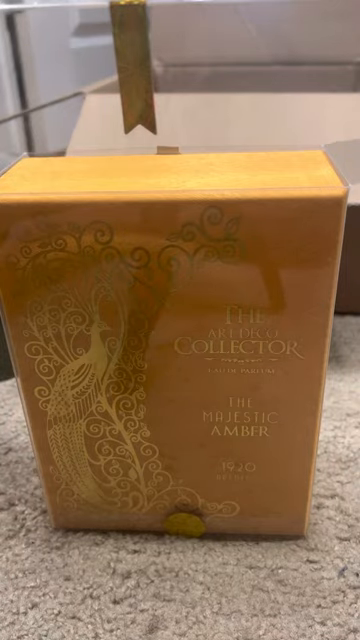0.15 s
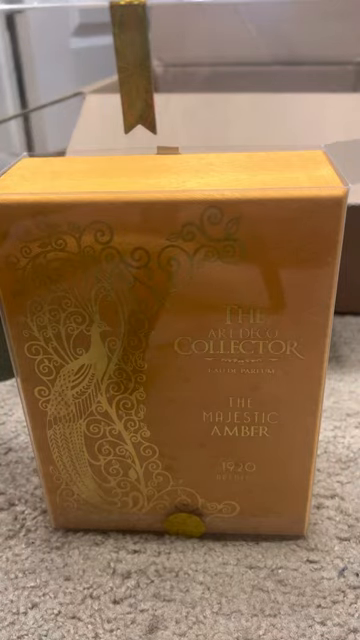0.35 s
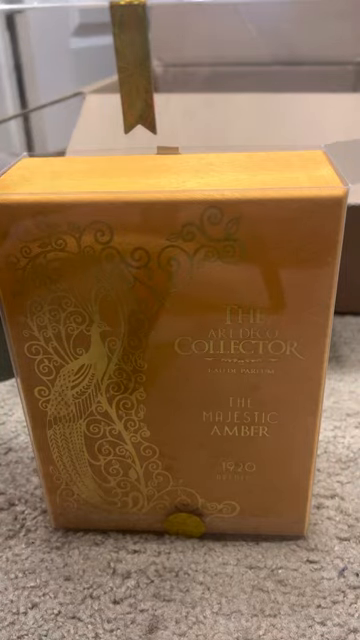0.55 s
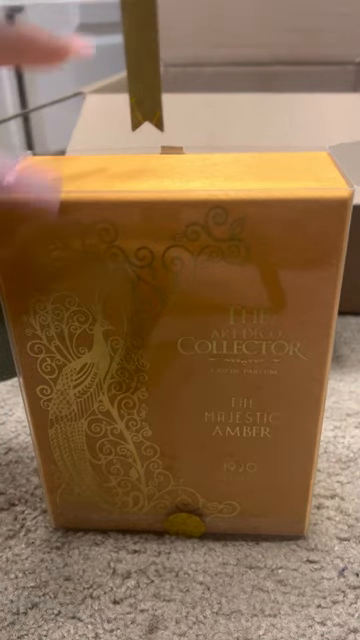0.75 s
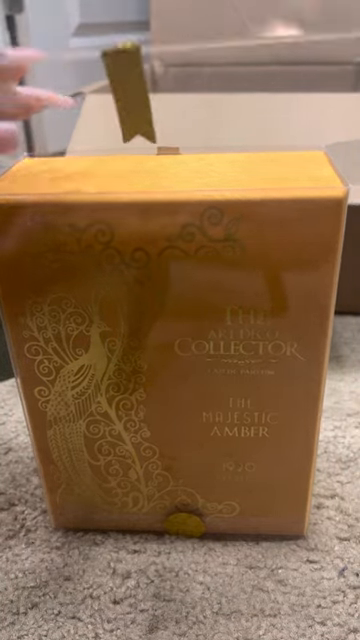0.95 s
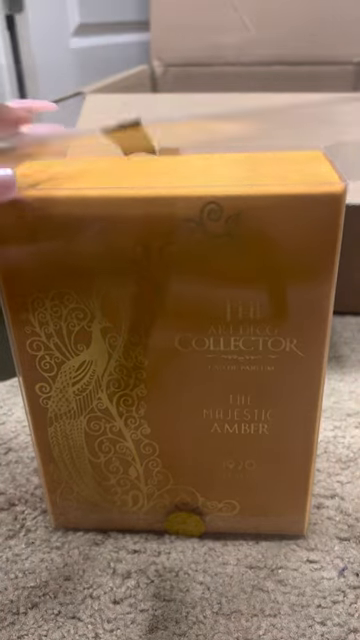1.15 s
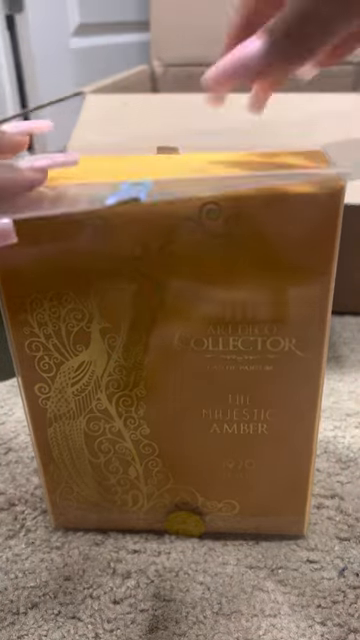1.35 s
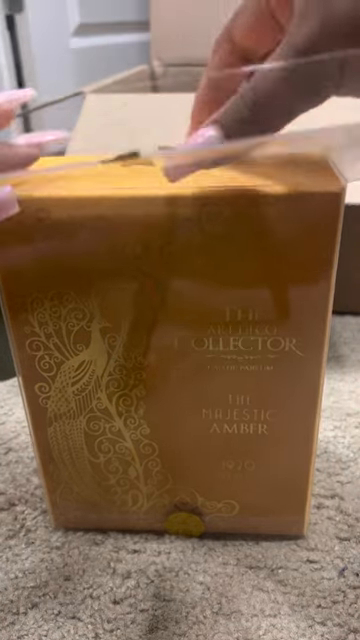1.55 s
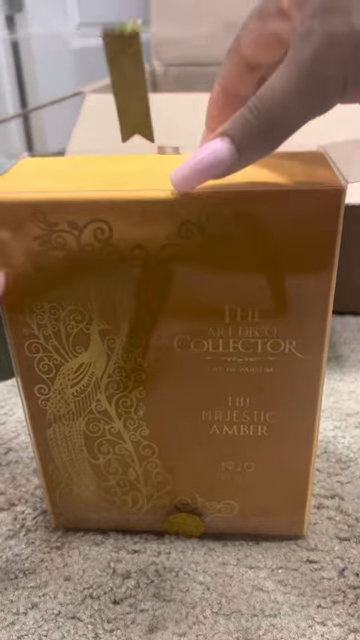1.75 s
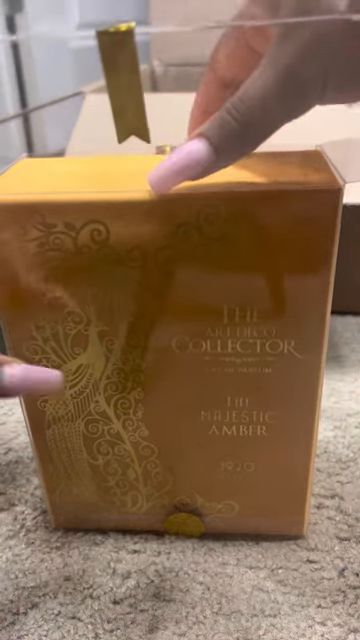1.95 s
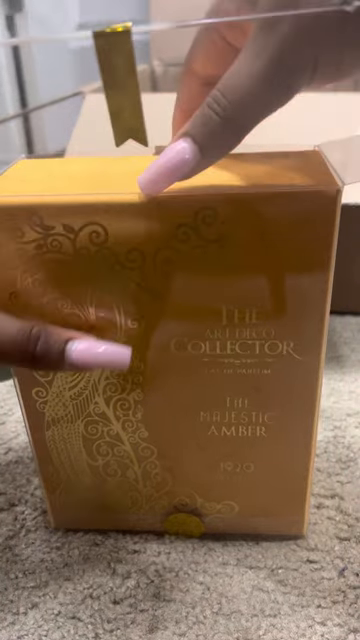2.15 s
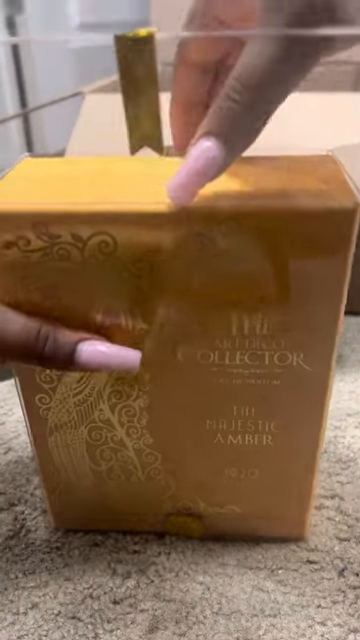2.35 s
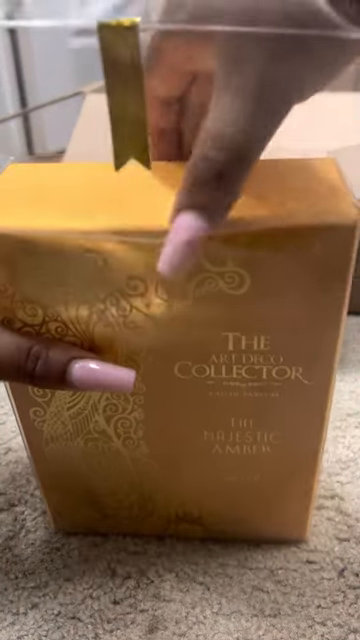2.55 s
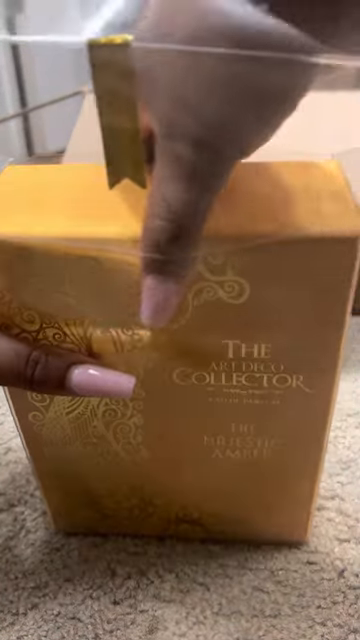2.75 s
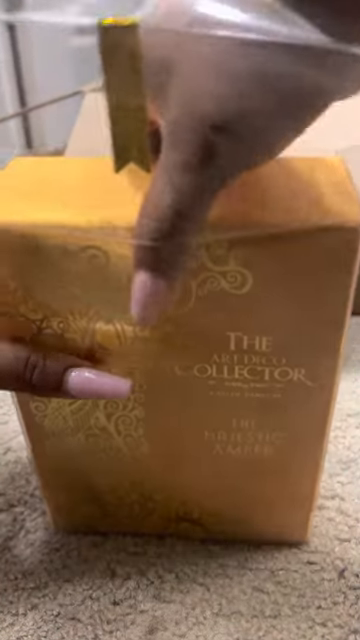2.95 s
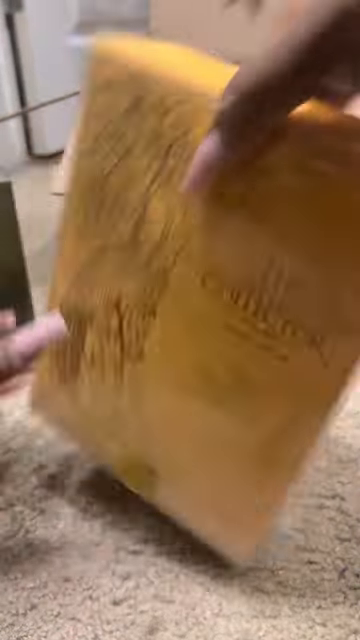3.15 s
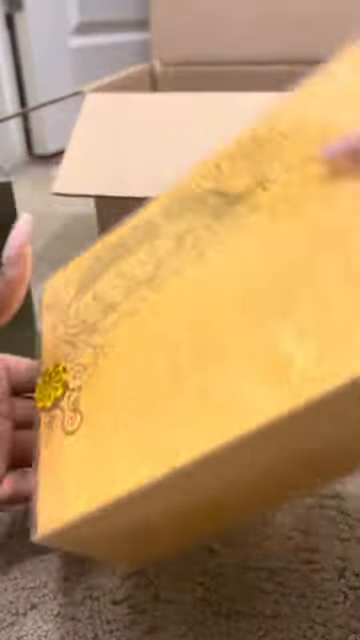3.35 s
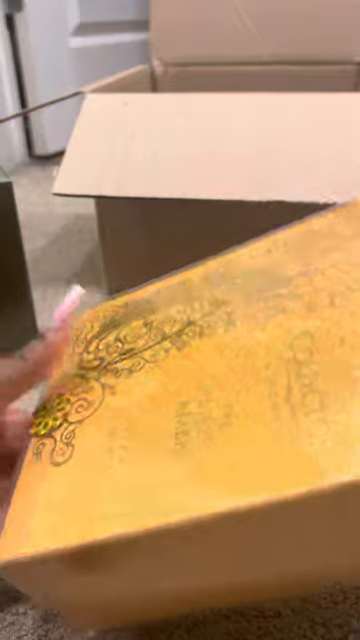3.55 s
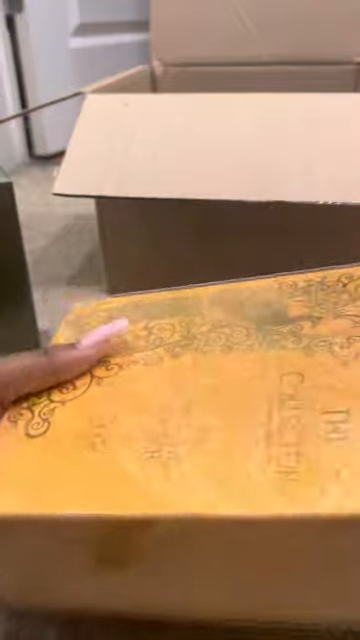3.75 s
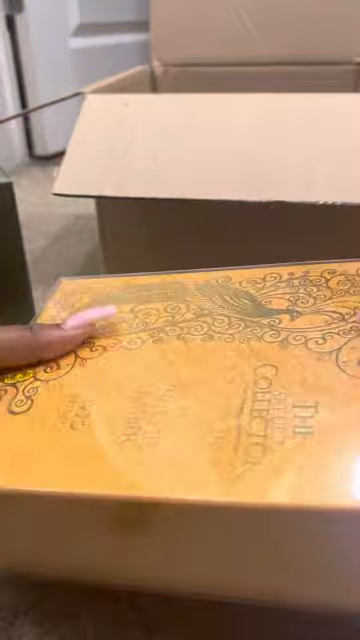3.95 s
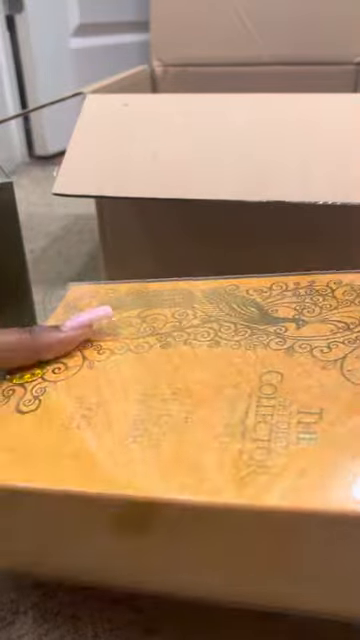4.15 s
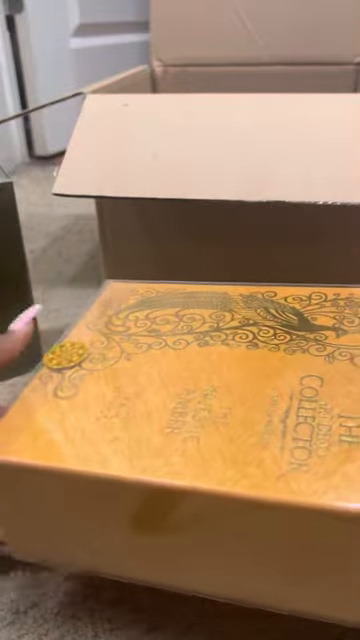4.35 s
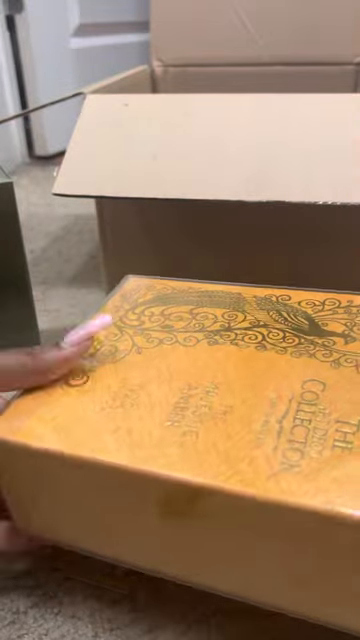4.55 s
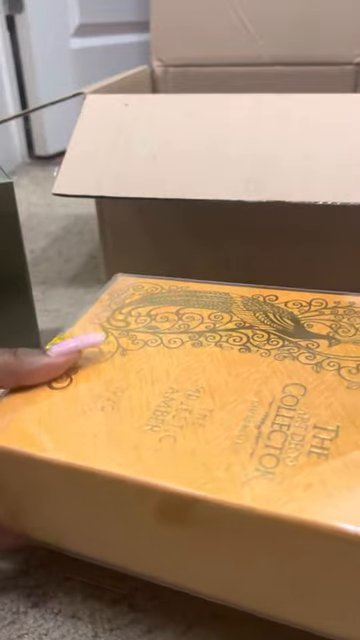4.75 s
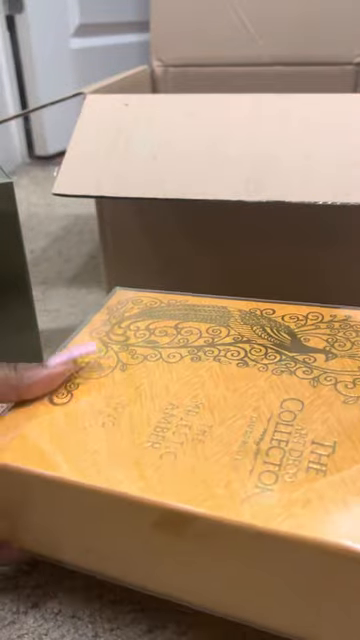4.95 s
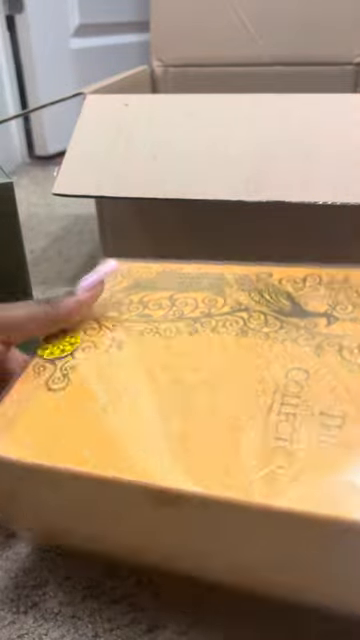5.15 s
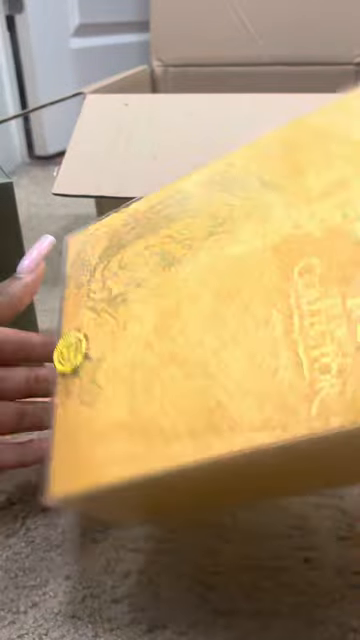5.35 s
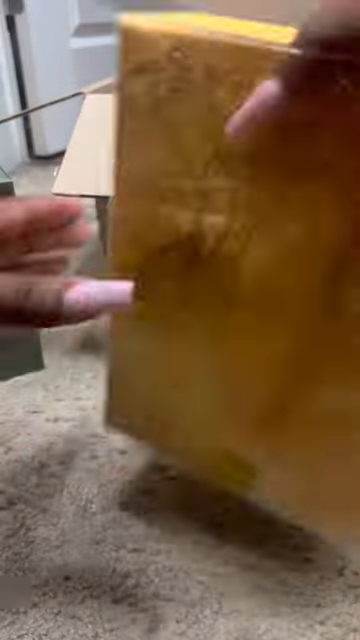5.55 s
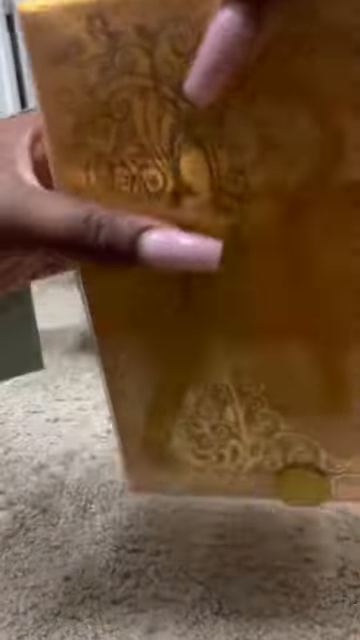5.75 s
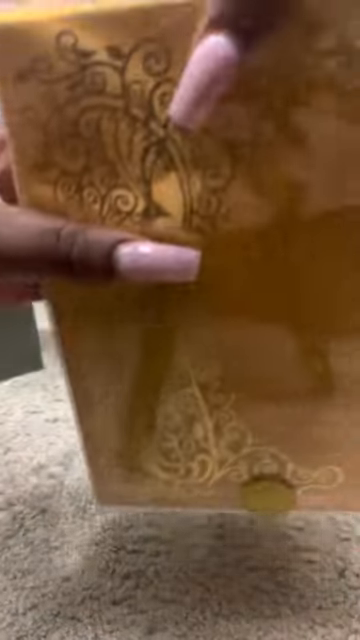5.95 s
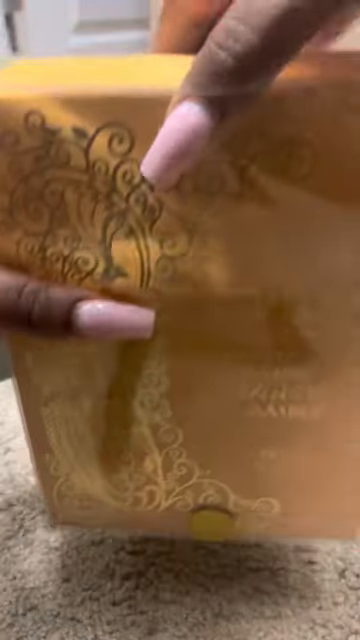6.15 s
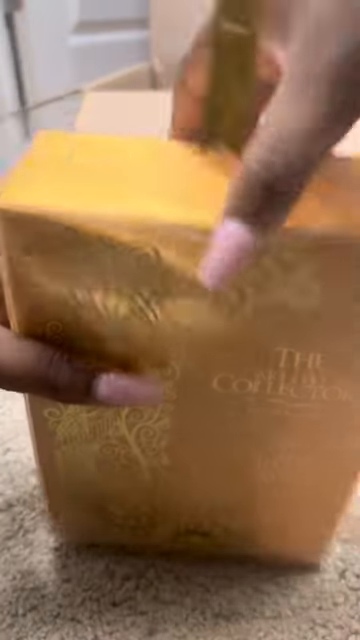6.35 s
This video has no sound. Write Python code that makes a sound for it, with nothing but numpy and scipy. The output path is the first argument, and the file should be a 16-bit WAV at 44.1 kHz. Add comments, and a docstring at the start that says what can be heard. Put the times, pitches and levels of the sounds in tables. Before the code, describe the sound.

Close, dry stereo handling sounds indoors. A stiff hollow box in thin plastic is tapped by long nails, gripped with squeaky rustling rubs, turned over and laid on carpet with soft boxy knocks and sharp little crackles. A quieter pause holds sparse clicks and faint rubs; then the box is picked up with a thump, swishing fingers and light taps. Low room rumble stays underneath.

```python
"""A quiet room rumbles, hums and hushes; then hands with long nails tip a stiff card box in a clear
plastic sleeve, lay it on a carpet and lift it again, close by and in stereo.
The box knocks hollow as decaying panel tones with a thump; nails and sleeve tick as band-split noise bursts.
Fingers slide over the plastic as grainy noise coloured by sleeve and box; a sparse echo tail adds the room."""
import sys
import numpy as np
from scipy import signal
from scipy.fft import rfft, irfft, next_fast_len
from scipy.io import wavfile
from scipy.ndimage import uniform_filter1d

SR = 44100
rng = np.random.default_rng(int(sys.argv[2]) if len(sys.argv) > 2 else 0)


def generate_wav(sig):
    """Save sig (samples, or channels by samples) to the path in sys.argv[1] as 16-bit PCM at SR."""
    pcm = np.round(np.clip(np.atleast_2d(sig).T, -1, 1) * 32767).astype(np.int16)
    wavfile.write(sys.argv[1], SR, pcm)


N = 286473  # samples in the scene

# pitch and height of the sleeve's ring while it settles or the hands rest on it
SETTLE_RING_HZ, SETTLE_RING_DB = 1790, -9.5


def gain_of(db):
    """Decibels to gain."""
    return 10 ** (np.asarray(db) / 20)


def evened(x):
    """Scales to rms 1."""
    return x / np.sqrt(np.mean(x ** 2) + 1e-20)


def wander(noise, samples):
    """Smooths noise twice over a window into a slow random drift of rms 1."""
    return evened(uniform_filter1d(uniform_filter1d(noise, samples), samples))


def read(points, hz):
    """Reads a table on a log-frequency axis."""
    f, value = np.transpose(points)
    return np.interp(np.log(hz + 1), np.log(f + 1), value)


def add(mix, s, sound):
    """Mixes a sound in at s seconds."""
    part = mix[..., round(s * SR):][..., :sound.shape[-1]]
    part += sound[..., :part.shape[-1]]


def shaped(x, response):
    """Filters x by a function of frequency."""
    size = next_fast_len(x.shape[-1])
    hz = np.fft.rfftfreq(size, 1 / SR)
    return irfft(rfft(x, size) * response(hz), size)[..., :x.shape[-1]]


def band(hz, centre_hz, octaves):
    """Gain of a flat-topped band, halved at the given octaves to either side of its centre."""
    return 1 / (1 + (np.log2((hz + 1) / centre_hz) / octaves) ** 6)


def paired(left, other):
    """Makes two channels whose likeness depends on frequency: the right is part left, part other."""
    # how alike left and right are: (f/Hz, likeness 0 to 1)
    likeness = [(60, 1), (130, 0.99), (290, 0.98), (640, 0.35), (1410, 0.94), (3100, 0.45), (6820, 1),
                (15000, 0.11)]
    same = lambda hz: np.clip(read(likeness, hz), -1, 1)
    different = lambda hz: np.sqrt(1 - same(hz) ** 2)
    return np.array([left, shaped(left, same) + shaped(other, different)])


def hush():
    """Soft low band of noise, independent in the two channels, that rises slightly, then sinks and stays low."""
    # the hush in the room: (t/s, level/dB)
    hush_levels = [(0, -80), (1.4, -78.5), (3.9, -85.5), (4.9, -85), (6.49, -85.5)]
    noise = evened(shaped(rng.standard_normal((2, N)), lambda hz: band(hz, 686, 0.56)))
    return noise * gain_of(np.interp(np.arange(N) / SR, *np.transpose(hush_levels)))


def air():
    """Rumble and hiss of the room, shaped noise that swells a little, with a steady mains hum."""
    # spectrum of the room air: (f/Hz, relative level/dB per Hz)
    air_colour = [(12, -42.5), (20, -27.5), (40, -13), (63, -1.5), (77, -1), (86, -10), (128, -9.5),
                  (185, -34.5), (238, -23), (333, -39.5), (619, -47), (1090, -51), (5260, -53), (8970, -57),
                  (16700, -76)]
    # width of the room air: (f/Hz, side over mid/dB)
    air_width = [(60, -23), (110, -14), (200, -7), (380, 8), (700, 16.5), (1290, 6), (2380, -5.5),
                 (4400, 0.5), (8120, 4), (15000, -12)]
    air_db, hum_db, hum_hz = -57.5, -66, 120  # rms levels and hum pitch
    mid, side, drift = rng.standard_normal((3, N))
    mid = shaped(mid, lambda hz: gain_of(read(air_colour, hz)))
    side = shaped(side, lambda hz: gain_of(read(air_colour, hz) + read(air_width, hz)))
    swell = gain_of(0.57 * wander(drift, 9000))
    scale = gain_of(air_db) / np.sqrt(np.mean(mid ** 2))
    hum = np.sqrt(2) * gain_of(hum_db) * np.sin(2 * np.pi * hum_hz * np.arange(N) / SR)
    return scale * swell * np.array([mid + side, mid - side]) + hum


def room(x):
    """Echoes x from sparse taps of random sign, one in every 20 samples, each band dying at its own speed."""
    # decay of the room: (f/Hz, t60/s)
    room_decay = [(200, 0.3), (1000, 0.19), (4000, 0.11), (12000, 0.28)]
    taps = np.zeros((2, SR // 2))
    at = np.arange(200, SR // 2 - 20, 20) + rng.integers(0, 20, (2, (SR // 2 - 201) // 20))
    np.put_along_axis(taps, at, rng.choice([-1., 1.], at.shape), 1)
    hz, t, bins = signal.stft(taps, SR, nperseg=256)
    decay = gain_of(-60 * t / read(room_decay, hz)[:, None])
    tail = signal.istft(bins * decay, SR, nperseg=256)[1]
    tail = tail / np.linalg.norm(tail[0])
    return paired(*signal.fftconvolve(x[None], tail, axes=1)[:, :N])


def contact(t):
    """Sums all touches at times t into powers of rub, treble and box, and pitch and height of the sleeve's ring."""
    # fingers and carpet sliding on the sleeve: (top reached t/s, rise/s, hold/s, fall/s, nominal rub level/dB,
    # treble share/dB, share carried by the box/dB, sleeve ring f/Hz, ring height/dB)
    slides = [(.53, 0.19, 0.053, 0.15, -74, -9.5, -10, 3480, 15),
              (.785, 0.13, 0.0036, 0.023, -62.5, -2, -3, 2630, 1),
              (.95, 0.11, 0.11, 0.28, -73.5, -16, -3, 2080, 6),
              (1.17, 0.47, 0.22, 0.082, -75.5, -8, 5, 3660, 4),
              (1.6, 0.052, 0.066, 0.068, -49.5, -12, 7, 1670, -14),
              (1.87, 0.15, .1, 0.16, -62, -27, 11.5, 1800, 5.5),
              (2.07, 0.14, 0.0083, 0.073, -68.5, -23, 14.5, 1850, -9),
              (2.17, 0.077, 0.075, 0.023, -58.5, -10.5, 3, 2140, -15),
              (2.29, 0.11, 0.017, 0.076, -63, -15.5, 9, 1280, -7),
              (2.43, 0.072, 0.014, 0.049, -56, -27, 10, 1780, 6),
              (2.6, 0.14, 0.076, 0.13, -47, -3, 3, 2500, -2),
              (2.68, 0.04, 0.039, 0.18, -54, -14, 13, 2130, 5),
              (2.83, 0.047, 0.072, 0.043, -48.5, -5, 5, 2270, 8),
              (3.05, 0.12, 0.074, .15, -56, -4.5, -9, 2520, 13),
              (3.2, 0.29, 0.058, .06, -61.5, 3, 7.5, 2400, 3),
              (3.31, 0.066, 0.024, 0.13, -52, -5.5, 9.5, 1720, 15),
              (3.37, .04, 0.035, 0.043, -48, -7, 0, 2440, 2),
              (3.57, 0.016, 0.092, 0.054, -53, -13, 5, 1880, 6.5),
              (3.79, 0.077, 0.0062, 0.15, -66, -13, 8, 2050, -18),
              (3.925, 0.022, 0.031, 0.11, -71, -5, 8.5, 2820, 7),
              (4.16, 0.085, 0.081, .06, -62.5, -1.1, 0.5, 2370, 16),
              (4.25, 0.076, 0.025, 0.038, -58.5, -3.5, 5, 2040, 13),
              (4.73, 0.066, 0.044, 0.035, -75, -7, -4, 2210, 2),
              (5.01, 0.035, 0.013, 0.13, -73.5, -0.5, -7.5, 2310, 8),
              (5.11, 0.034, 0.012, 0.057, -73, 8, 15, 2170, 8),
              (5.165, 0.095, 0.022, .04, -69, 0, 11, 2170, 4),
              (5.25, .1, 0.084, .05, -61, -4.5, 4, 2090, 14),
              (5.4, .1, 0.22, .12, -77, -6.5, 15.5, 3330, 3),
              (5.59, 0.096, 0.055, 0.036, -65.5, -12, 5, 1880, 7),
              (5.745, 0.09, 0.0058, 0.045, -63, -0.5, 7, 1830, 0),
              (5.79, 0.07, 0.083, 0.049, -58, -6.5, 8, 1910, 1),
              (5.93, 0.046, .01, 0.1, -73, -20, 11, 1760, 0),
              (6.12, 0.081, 0.1, 0.088, -55.5, -4.5, 8.5, 1930, 1),
              (6.37, 0.11, 0.018, 0.042, -49, -3, 4, 1890, 6),
              (6.41, .05, 0.064, 0.077, -57.5, -4, 3.5, 2020, 3)]
    # the sleeve settling after a blow: (peak t/s, fall/s, nominal rub level/dB, share carried by the box/dB)
    settlings = [(.69, 0.036, -66, 14), (0.819, 0.23, -56.5, 11), (1.491, 0.047, -54, 10),
                 (1.689, 0.086, -66.5, 27), (1.8, 0.061, -76, 23), (2.488, 0.068, -45, 11),
                 (2.97, 0.082, -59.5, 19.5), (3.44, 0.14, -56, 14.5), (3.68, 0.17, -65, 15),
                 (4.489, 0.062, -60, 11), (4.565, 0.09, -61.5, 12.5), (5.668, 0.063, -50.5, -22)]
    settle_rise_s, settle_treble_db = 0.035, -11
    rest_db, rest_treble_db, rest_box_db = -95.5, -10, 25  # hands resting on the sleeve
    depth_db, roundness = 20, 0.97  # down by this after the rise or fall time; 1 = pointed, 2 = round

    touches = slides + [(s, settle_rise_s, 0, fall, db, settle_treble_db, box_db, SETTLE_RING_HZ, SETTLE_RING_DB)
                        for s, fall, db, box_db in settlings]
    s, rise, hold, fall, db, treble_db, box_db, ring_hz, ring_db = np.transpose(touches)[:, :, None]
    before, after = (s - t) / rise, (t - s - hold) / fall
    away = np.maximum(np.maximum(before, after), 0)
    power = gain_of(db - depth_db * away ** roundness) ** 2
    rest = gain_of(rest_db) ** 2

    rub = power.sum(0) + rest
    treble = (power * gain_of(treble_db) ** 2).sum(0) + rest * gain_of(rest_treble_db) ** 2
    box = (power * gain_of(box_db) ** 2).sum(0) + rest * gain_of(rest_box_db) ** 2
    # the stronger touch has more say in the ring
    mean_ring_hz = ((power * ring_hz).sum(0) + rest * SETTLE_RING_HZ) / rub
    mean_ring_db = ((power * ring_db).sum(0) + rest * SETTLE_RING_DB) / rub
    return rub, treble, box, mean_ring_hz, mean_ring_db


def rubbing():
    """Skin and fibres slip in dense, clumped grains; the free part of the sleeve rings with a moving pitch."""
    # slow rub of the sleeve: (f/Hz, relative level/dB per Hz)
    sleeve_colour = [(290, -33.5), (500, -23.5), (581, -2), (1160, -0.5), (1730, -10), (2000, -10.5),
                     (2810, -9.5), (3230, -7), (3790, -8.5), (5500, -23), (7150, -40.5), (12100, -120)]
    # fast rub, the treble: (f/Hz, relative level/dB per Hz)
    sizzle_colour = [(2350, -45.5), (4000, -3.5), (4450, -0.5), (5230, -7.5), (5830, 0.5), (13000, -14),
                     (14700, -15), (15700, -15.5), (16700, -60.5)]
    # box carrying the rub: (f/Hz, relative level/dB per Hz)
    boom_colour = [(35, -36.5), (60, -4), (113, -6), (150, -5), (183, -4), (270, -20.5), (385, -9.5),
                   (600, -49.5), (780, -42), (1320, -120)]

    clumps = wander(rng.standard_normal(N), 250)
    catches = wander(rng.standard_normal(N), 900)  # the fingers catch and let go
    grain_sizes = np.minimum(rng.exponential(1, N), 6)
    grains = gain_of(2 * catches + 0.86 * grain_sizes + 0.49 * clumps)
    hz, t, slips = signal.stft(paired(*rng.standard_normal((2, N)) * grains), SR, nperseg=512, noverlap=384)

    *powers, ring_hz, ring_db = contact(t)
    ring = 1 + gain_of(ring_db) / (1 + (np.log2((hz[:, None] + 1) / ring_hz) / 0.4) ** 4)
    sleeve = gain_of(read(sleeve_colour, hz))[:, None] * ring
    sizzle = gain_of(read(sizzle_colour, hz))[:, None]
    boom = gain_of(read(boom_colour, hz))[:, None]
    colour = np.sqrt(sum(body ** 2 / (body ** 2).mean(0) * power
                         for body, power in zip((sleeve, sizzle, boom), powers)))

    # the contact wanders, so patches of the spectrum come and go
    patches = uniform_filter1d(rng.standard_normal(slips.shape[1:]), 5, 0)
    patches = evened(uniform_filter1d(patches, 14, 1))
    colour = colour * gain_of(2.95 * patches - 3.5)
    rub = signal.istft(slips * colour, SR, nperseg=512, noverlap=384)[1][:, :N]
    return rub / np.sqrt(np.mean(grains ** 2))


def ticks():
    """A burst of tiny snaps: the card gives a woody note and a bite, the sleeve a crack, the nail edge a spit."""
    # nails tapping the card: (t/s, note level/dB, woody note f/Hz, edge share/dB, t60/s,
    # pan/dB: half of it is the lead of left over right)
    nail_taps = [(.666, -58.5, 1030, 3, 0.071, 5), (.794, -32.5, 1290, 0.5, .02, 1.5),
                 (1.461, -32, 970, -20.5, 0.025, 1.5), (1.476, -36, 780, -3.5, 0.011, -6),
                 (1.548, -50, 744, -8, 0.075, -1.5), (1.666, -37, 634, -16, 0.071, -4),
                 (1.575, -45, 690, -34, 0.025, 0.6), (1.686, -45.5, 1160, -21, 0.023, 0.6),
                 (1.788, -53.5, 840, -18, 0.071, 1), (2.038, -46, 770, -27, .04, 0),
                 (2.05, -43.5, 1000, -19.5, 0.013, -1), (2.443, -32.5, 1100, -12, 0.046, -0.5),
                 (2.932, -20, 1256, -30, 0.018, -5.5), (3.318, -42, 996, -2, 0.022, -7),
                 (3.416, -32, 726, -34, 0.023, -17.5), (3.565, -59, 799, -11, 0.027, -12.5),
                 (3.636, -35.5, 1167, -13, 0.056, -11.5), (3.645, -26, 1130, -30, 0.035, -9.5),
                 (4.544, -52.5, 1510, 7.5, .037, 0), (4.551, -42.5, 1330, -11.5, 0.024, -5),
                 (5.643, -44.5, 776, -33, 0.0077, -4), (5.74, -49, 1320, -3, 0.041, -.6),
                 (5.77, -49.5, 696, -4, 0.031, -3), (6.315, -57, 914, 5, 0.026, -4),
                 (6.373, -49, 1030, -2.5, 0.045, -1.5)]
    # the sleeve cracking under a nail: (t/s, bite level/dB, crack level/dB, spit level/dB, spit f/Hz, pan/dB as above)
    sleeve_cracks = [(0.98, -53, -52, -87, 6110, .6), (1.15, -84, -46, -92, 7350, 1),
                     (1.616, -38.5, -71, -46, 6110, -2.5), (2.097, -59, -72, -89, 8100, -2),
                     (2.37, -62, -67, -74, 7000, 0.6), (2.462, -32, -45, -28, 7300, 6),
                     (2.6, -45, -47, -44, 7000, 0.6), (2.827, -43.5, -61, -40, 8400, -1.5),
                     (2.852, -43, -44, -43.5, 8670, -2), (2.884, -44, -50, -34, 8700, 0),
                     (3.312, -39, -41, -46, 7700, 10), (3.337, -37, -41, -42, 6900, 3),
                     (3.354, -27, -24, -22.5, 7270, -.6), (3.606, -52, -47, -42.5, 11940, 13),
                     (3.612, -57, -59, -40.5, 11600, -19), (3.619, -51, -82, -45, 11600, -11),
                     (3.784, -59, -57, -52, 6680, -4), (3.789, -60.5, -64, -36.5, 12000, 0),
                     (3.861, -73.5, -68, -61, 7190, -3), (3.911, -53, -41, -18, 10600, 1.5),
                     (4.15, -56.5, -57, -42, 14300, -1.5), (4.249, -52, -68, -52, 7100, -5),
                     (4.277, -45.5, -48, -43, 8900, -1.5), (4.47, -46.5, -44, -43, 7100, 0.5),
                     (4.627, -80.5, -65, -72.5, 7000, -1.5), (4.759, -72, -76, -88, 7000, -4),
                     (4.774, -72, -76, -90, 7000, -1.5), (5.158, -62, -61, -47, 9000, -1.5),
                     (5.167, -64, -66, -41, 12600, -1.5), (5.952, -63, -69, -54, 7400, 3),
                     (5.967, -47.5, -44, -39, 10700, 1)]
    bite_part, crack_part = 0.43, 1  # how much of a tap's edge share, in dB, its bite and crack follow
    tap_spit_hz = 6800
    crack_note_hz, crack_note_db, crack_t60_s = 930, -8, 0.016  # the note of a crack lies under its bite

    rows = [(s, hz, db, db + bite_part * edge_db, db + crack_part * edge_db, db + edge_db, tap_spit_hz, t60, pan_db)
            for s, db, hz, edge_db, t60, pan_db in nail_taps]
    rows += [(s, crack_note_hz, bite_db + crack_note_db, bite_db, crack_db, spit_db, hz, crack_t60_s, pan_db)
             for s, bite_db, crack_db, spit_db, hz, pan_db in sleeve_cracks]
    lead_s = 0.004  # silence ahead of each snap
    out, t = np.zeros((2, N)), np.arange(4096) / SR - lead_s
    bursts = rng.standard_normal((len(rows), len(t)))
    for row, burst in zip(rows, bursts):
        s, note_hz, note_db, bite_db, crack_db, spit_db, spit_hz, t60, pan_db = row
        attack = np.clip(t / 0.00018, 0, 1)
        snap = burst * attack * gain_of(-60 * t / t60)
        bands = ((note_hz, 0.55, note_db), (2050, 0.4, bite_db), (3800, 0.38, crack_db), (spit_hz, 0.8, spit_db))
        sound = 0
        for centre_hz, octaves, db in bands:
            part = shaped(snap, lambda hz: band(hz, centre_hz, octaves))
            sound = sound + gain_of(db) * part / abs(part).max()
        sides = gain_of(np.array([[pan_db], [-pan_db]]) / 4)
        add(out, s - lead_s, sides * sound)
    return out


def knocks():
    """A soft push thumps and rings the panels; each blow starts with its treble, then glides quickly down."""
    # blows on the box: (t/s before the bass delay, peak level/dB before the softening filter, pitch factor of the
    # panels as they are gripped, pitch favoured by the push f/Hz, ring time factor, thump over panels/dB)
    blows = [(0.795, -25.5, 1.38, 120, 0.3, -24), (0.944, -33, 0.66, 93.6, 2, 7),
             (1.463, -28.5, 0.95, 202, 1.15, -38), (1.476, -55, 0.7, 148, 0.82, 20),
             (1.665, -26, 0.94, 168, 1.1, -23), (1.674, -29, 1.1, 414, 0.59, -12),
             (1.788, -38, 1.2, 72.4, 0.33, -9), (2.443, -27, 0.79, 80, 1.5, -11.5),
             (2.46, -15, 0.85, 240, 0.78, -12), (2.881, -35, 1.01, 138, 0.43, 19.5),
             (2.929, -15.5, 1.35, 249, 0.79, -6.5), (3.323, -27.5, 0.64, 248, 0.68, -12),
             (3.334, -36.5, 1.95, 164, 1.3, -23.5), (3.414, -18.5, 0.98, 350, 1.03, -3.5),
             (3.636, -16.5, 1.1, 326, 0.72, -18), (3.643, -14.5, 0.75, 290, 0.95, -2.5),
             (4.475, -33, 0.89, 218, 0.79, 6.5), (4.552, -34.5, 0.9, 273, 0.57, -12),
             (5.642, -15, 0.96, 147.6, 1.03, 1), (5.776, -36.5, 0.89, 137, 0.47, -8),
             (5.882, -35, 0.75, 112, 0.42, 12), (5.95, -41.5, 1.22, 227, 0.99, 3)]
    # panels and air of the box, before a blow's pitch and ring factors: (f/Hz, level/dB, t60/s)
    panel_modes = [(72, -1.5, 0.16), (103.4, 3.5, 0.18), (168, 0, 0.1), (198, -4, 0.12), (231, -0.5, 0.092),
                   (295, -6, 0.2), (348, -0.5, 0.04), (408, -8.5, 0.15), (875, -6.5, 0.028),
                   (1070, -11.5, 0.062), (1350, -15, .03)]
    bass_delay = 0.1075  # delay in s at 1 Hz, falling as 1 / sqrt(Hz)

    out, t = np.zeros(N), np.arange(SR // 3) / SR
    hz, db, t60 = np.transpose(panel_modes)[:, :, None]
    spots = 1.5 * rng.standard_normal((len(blows), len(panel_modes), 1))  # dB, each blow drives the modes unevenly
    for (s, peak_db, pitch, push_hz, ring, thump_db), spot_db in zip(blows, spots):
        # the push length favours one pitch
        reach = gain_of(db + spot_db) / (1 + (np.log2(hz / push_hz) / 0.62) ** 2)
        decay = gain_of(-60 * t / (t60 * ring))
        panels = (reach * decay * np.sin(2 * np.pi * hz * pitch * t)).sum(0)
        thump = np.exp(-push_hz * t / 2.1) * np.sin(2 * np.pi * push_hz * t)
        sound = panels / abs(panels).max() + gain_of(thump_db) * thump / abs(thump).max()
        add(out, s - 0.0005, gain_of(peak_db) * sound / abs(sound).max())

    def soften(f):
        """Delays the bass most, rounds the attack as soft card does, and drops the deep bass of a small box."""
        late = np.exp(-4j * np.pi * bass_delay * np.sqrt(f))
        return late / (1 + (f / 1100) ** 2) / (1 + (60 / (f + 1)) ** 4)

    return shaped(out, soften)


def phase_spread(near):
    """Near hits differ in phase between left and right by an angle that depends on frequency."""
    # width of the near hits: (f/Hz, side over mid/dB)
    near_width = [(60, -37), (110, -35), (200, -28), (380, -7.5), (700, -1), (1290, -22), (2380, -12.5),
                  (4400, 1), (8120, -1), (15000, 5.5)]
    angle = lambda hz: np.arctan(gain_of(read(near_width, hz)))
    left = shaped(near[0], lambda hz: np.exp(-1j * angle(hz)))
    right = shaped(near[1], lambda hz: np.exp(1j * angle(hz)))
    return np.array([left, right])


def scene():
    """Near hits and their room echoes, over the rubbing, the room air and the hush."""
    box, nails = knocks(), ticks()
    dull_nails = shaped(nails.mean(0), lambda hz: 1 / (1 + (hz / 9000) ** 3))  # carpet eats treble
    wet = gain_of(-10) * room(dull_nails)
    wet = wet + gain_of(-9) * room(box)
    return phase_spread(box + nails) + wet + rubbing() + air() + hush()


def record(dry):
    """The band limit: a steep linear-phase low-pass at 16.7 kHz."""
    low_pass = signal.firwin(511, 16700, window=("kaiser", 9), fs=SR)
    return signal.oaconvolve(dry, low_pass[None], "same")


dry = scene()
out = record(dry)
generate_wav(out)
```